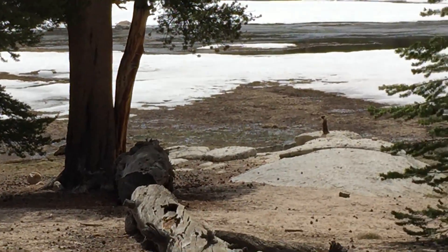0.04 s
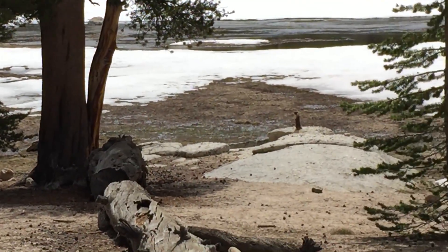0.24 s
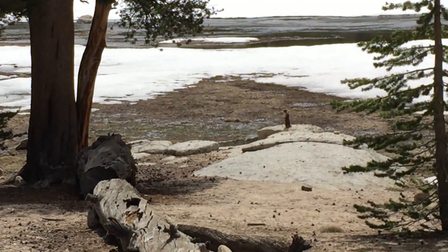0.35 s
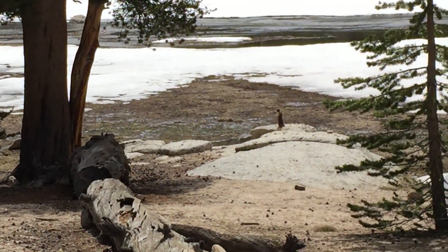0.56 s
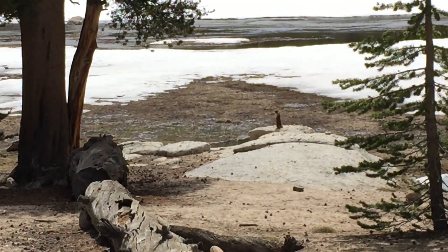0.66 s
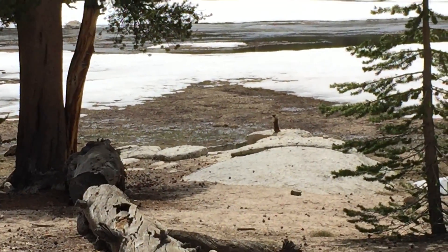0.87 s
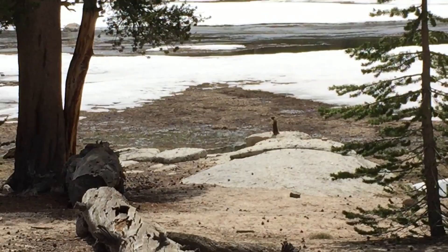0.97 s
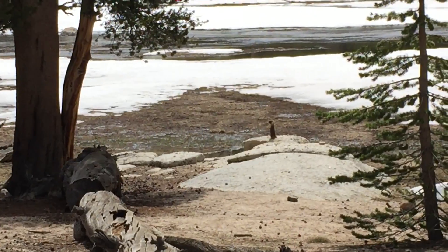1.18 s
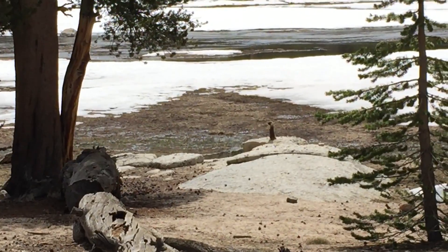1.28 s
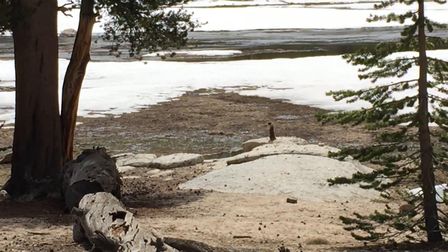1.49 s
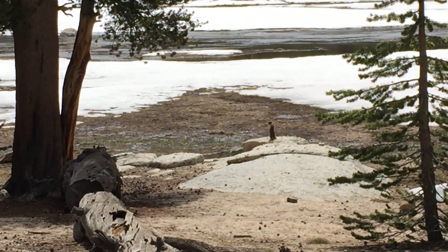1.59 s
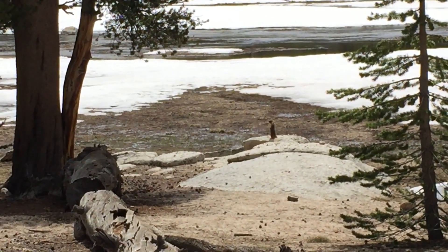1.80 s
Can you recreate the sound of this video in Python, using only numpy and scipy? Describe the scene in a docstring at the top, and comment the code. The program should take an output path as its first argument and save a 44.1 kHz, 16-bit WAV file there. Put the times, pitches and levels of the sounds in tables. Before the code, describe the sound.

Two sharp marmot whistles with echoing tails, over faint wind and distant water.

```python
"""A marmot on a rock at the edge of a mountain meadow gives two sharp alarm whistles.
Each is a harmonic tone that starts high and plunges, sweeping its overtones through the mouth resonance.
Rock, ground, nearby trees and the far forest edge scatter the calls back as echoes.
Beneath them lie light wind, distant running water, ticks of hiss, a far chirp and a faint whistling."""
import sys
import numpy as np
from scipy import signal
from scipy.fft import rfft, irfft, next_fast_len
from scipy.io import wavfile

SR = 44100
rng = np.random.default_rng(int(sys.argv[2]) if len(sys.argv) > 2 else 0)


def store_wav(level_fs):
    """Save 16-bit WAV to argv[1]."""
    pcm = np.round(np.clip(np.atleast_2d(level_fs), -1, 1) * 32767)
    wavfile.write(sys.argv[1], SR, pcm.T.astype(np.int16))


N = 81585

# noise spectra: frequency_hz, relative_level_db
WIND_SPECTRUM = [(20, -47), (35, -10), (60, -2), (105, 1.5), (175, -1), (240, -9.5), (310, -12.5),
                 (380, -18), (520, -26), (1000, -61)]
WATER_SPECTRUM = [(200, -45), (520, -9.5), (740, 5), (1200, 1), (1800, -3), (2300, -10.5), (3200, -11),
                  (4300, -19), (6500, -22.5), (9000, -26), (12000, -27.5), (16000, -29)]
TICK_SPECTRUM = [(1500, -33), (3300, 9), (6000, -6), (11000, -10), (15000, -10)]
# envelopes of the wind rumble and the faint whistling: time_s, level_db
WIND_ENVELOPE = [(0.0, -49.5), (0.102, -57), (0.132, -50.5), (0.292, -54), (0.406, -51.5), (0.778, -52.5),
                 (0.896, -48.5), (0.916, -69), (0.936, -51.5), (1.204, -50.5), (1.256, -48), (1.442, -53.5),
                 (1.478, -49), (1.664, -56.5), (1.684, -50), (1.85, -50.5)]
WHISTLING_ENVELOPE = [(1.42, -117), (1.52, -63), (1.65, -59), (1.85, -68.5)]
# ticks of hiss: centre_s, half_width_s, level_db
TICKS = [(0.2316, 0.0015, -52), (0.258, 0.017, -57.5), (1.098, 0.0032, -67.5), (1.228, 0.0022, -66)]
# distant chirp: centre_s, pitch_hz, level_db
FAR_CHIRPS = [(1.099, 2770, -56)]
# frequency responses of the reflectors: frequency_hz, gain_db
ROCK_RESPONSE = [(1000, 13), (2200, -3), (3000, -3), (3300, -4.5), (4300, -7), (5500, -5.5), (6500, 3),
                 (8000, -2), (11000, 1)]
TRUNKS_RESPONSE = [(800, -7), (2200, -6.5), (2800, 0), (3200, 5), (4300, -16), (5500, -7.5), (6400, -1.5),
                   (8000, -8), (15000, -4.5)]
BRANCHES_RESPONSE = [(1000, -6), (2500, 8), (3200, -10), (4300, -20), (5600, 4), (7000, 4), (10000, 5),
                     (15000, -4)]
FOREST_RESPONSE = [(800, 16), (2000, -13), (2500, -12), (2950, 6.5), (3250, -2.5), (4200, -18.5),
                   (6500, -30), (15000, -40)]
# mouth resonance: frequency_hz, gain_db
MOUTH_RESPONSE = [(700, -27), (1200, -18.5), (1800, -16.5), (2300, -7.5), (2700, -2), (3200, 0.5),
                  (3800, 1), (4400, 9), (5150, -3), (5750, -14), (6500, -21), (8000, -19.5), (9600, -23.5),
                  (11000, -22), (12000, -41), (16000, -58)]
# harmonics ahead of the mouth, fundamental first: level_db, attack_s, duration_share_of_plunge
HARMONICS = [(-1, 0.00091, 1), (-7, 0.0012, 0.85), (-13.5, 0.0023, 0.69), (-13, 0.013, 0.76)]
# alarm calls: start_s, pitch_hz, plunge_s, level_db, dip_db, push_db, overtone_push_db,
# forest_echo_db, forest_depth_s
WHISTLES = [(0.2472, 3218, .0392, -24, -4.5, -1.5, 0.5, -15, 0.3),
            (1.5311, 3199, 0.038, -24.5, -14, 1, 2, -16.5, 0.3)]

PLUNGE_POWER, ONSET_HZ, ONSET_S = 3.0, 940, 0.00063  # the pitch overshoots at onset and settles at once
DIP_AT_S, DIP_WIDTH_S, PUSH_AT_S, PUSH_WIDTH_S = 0.015, 0.0027, 0.024, 0.006  # a dip, then a swell
JITTER, PLUNGE_JITTER = 0.0017, 0.02  # shares of the pitch: the tone roughens as it drops
FADE_AT_SHARE, FADE_DB_PER_S, RELEASE_S = 0.81, 1300, 0.0055
CLUMP_DB, CLUMP_RATE_HZ = 3, 16.7  # reflections arrive in clumps


def undb(db):
    """Amplitude grows tenfold for every 20 decibels."""
    return 10 ** (np.asarray(db) / 20)


def gain_at(hz, curve):
    """A frequency response, interpolated in decibels along a logarithmic frequency axis."""
    frequency_hz, gain_db = np.array(curve, float).T
    return undb(np.interp(np.log(np.maximum(hz, 1)), np.log(frequency_hz), gain_db))


def filtered(x, curve):
    """Linear filtering multiplies a spectrum by a frequency response."""
    return irfft(rfft(x) * gain_at(np.fft.rfftfreq(len(x), 1 / SR), curve), len(x))


def noise(spectrum):
    """Filtered white noise takes the spectral shape of its filter; scaled to rms 1."""
    x = filtered(rng.standard_normal(N), spectrum)
    return x / x.std()


def drift(rate_hz):
    """Low-pass noise gives a smooth random modulation of standard deviation 1."""
    size = next_fast_len(N)
    hz = np.fft.rfftfreq(size, 1 / SR)
    x = irfft(rfft(rng.standard_normal(size)) * np.exp(-(hz / rate_hz) ** 2) * (hz > 0), size)[:N]
    return x / x.std()


def bump(t, centre_s, half_width_s):
    """A Gaussian pulse of height 1."""
    return np.exp(-((t - centre_s) / half_width_s) ** 2)


def wind(t):
    """Wind rumbles as low-frequency noise and flutters by amplitude modulation."""
    rumble = noise(WIND_SPECTRUM)
    level_db = np.interp(t, *np.array(WIND_ENVELOPE).T) + 0.5
    return rumble * undb(level_db + drift(rate_hz=19))


def distant_water(level_db=-60.5, flicker_db=2.5):
    """Running water is broadband noise; its quarter-octave bands are modulated independently."""
    spectrum = rfft(noise(WATER_SPECTRUM))
    hz = np.fft.rfftfreq(N, 1 / SR)
    band_of_bin = np.floor(4 * np.log2(np.maximum(hz, 200) / 200))
    rush = 0
    for band in np.unique(band_of_bin):
        flicker = undb(flicker_db * drift(rate_hz=19) * (band < 16))  # steady above 3200 Hz
        rush = rush + irfft(spectrum * (band_of_bin == band), N) * flicker
    return undb(level_db) * rush


def ticks(t):
    """Short envelopes on high-frequency noise are heard as thin ticks."""
    return noise(TICK_SPECTRUM) * sum(undb(db) * bump(t, at_s, width_s) for at_s, width_s, db in TICKS)


def faint_whistling(t, centre_hz=1915, half_width_hz=290):
    """Narrow-band noise has a vague pitch at its centre; this band swells toward the end."""
    band = noise([(centre_hz - 2 * half_width_hz, -22), (centre_hz, 0),
                  (centre_hz + 2 * half_width_hz, -22)])
    edges_hz = [centre_hz - half_width_hz, centre_hz + half_width_hz]
    band = signal.sosfilt(signal.butter(1, edges_hz, "band", fs=SR, output="sos"), band)
    return band / band.std() * undb(np.interp(t, *np.array(WHISTLING_ENVELOPE).T))


def scatter(x, envelope):
    """Diffuse reflection is convolution with a noisy impulse response, here of about unit energy."""
    strength = envelope * undb(CLUMP_DB * drift(CLUMP_RATE_HZ))
    response = rng.standard_normal(N) * strength / np.sqrt(np.sum(strength ** 2))
    return signal.fftconvolve(x, response)[:N]


def far_chirp(t, half_width_s=0.005, fall_hz_per_s=30000):
    """A linear downward frequency sweep makes a faint chirp, trailed by its diffuse echo."""
    chirp = 0
    for centre_s, pitch_hz, level_db in FAR_CHIRPS:
        offset_s = t - centre_s
        phase = 2 * np.pi * offset_s * (pitch_hz - fall_hz_per_s * offset_s / 2)
        chirp = chirp + undb(level_db) * bump(t, centre_s, half_width_s) * np.sin(phase)
    return chirp + undb(-0.5) * scatter(chirp, np.exp(-t / 0.15))


def decay(t, delay_s, t60_s):
    """Reverberation begins after the travel delay and decays exponentially, 60 dB in t60_s."""
    return (t > delay_s) * np.exp(-np.log(1000) * np.maximum(t - delay_s, 0) / t60_s)


def echoes(t, call, forest_db, depth_s, edge_s=0.016):
    """Longer paths return later: rock and ground first, then trunks, forest and branches."""
    ground = undb(-21) * scatter(call, decay(t, delay_s=0.015, t60_s=0.083))
    rock = undb(-4) * scatter(filtered(call, ROCK_RESPONSE), decay(t, delay_s=0.00063, t60_s=0.068))
    trunks = undb(-7) * filtered(scatter(call, decay(t, delay_s=0.025, t60_s=0.18)), TRUNKS_RESPONSE)
    # past the forest's depth the wash drops to a weaker tail
    far_edge = 0.5 - 0.5 * np.tanh((t - depth_s) / edge_s / 2)
    wash = decay(t, delay_s=0.073, t60_s=2.17) * (far_edge + undb(-14))
    forest = undb(forest_db) * scatter(filtered(call, FOREST_RESPONSE), wash)
    branches = undb(-27) * scatter(filtered(call, BRANCHES_RESPONSE), decay(t, delay_s=0.1, t60_s=0.54))
    return rock + ground + trunks + branches + forest


def marmot_whistle(t, start_s, pitch_hz, plunge_s, level_db, dip_db, push_db, overtone_push_db):
    """Source and filter: a tone plunges ever faster, and the mouth resonance picks out its octave."""
    age_s = np.clip(t - start_s, 0, plunge_s)
    plunge = (age_s / plunge_s) ** PLUNGE_POWER
    hz = pitch_hz * (1 - plunge) + ONSET_HZ * np.exp(-age_s / ONSET_S)
    jitter = (JITTER + PLUNGE_JITTER * plunge) * drift(rate_hz=980)
    phase = 2 * np.pi * np.cumsum(hz * (1 + jitter) * (age_s > 0)) / SR
    dip = bump(age_s, DIP_AT_S, DIP_WIDTH_S)
    push = bump(age_s, PUSH_AT_S, PUSH_WIDTH_S)
    fade_db = FADE_DB_PER_S * np.maximum(age_s - FADE_AT_SHARE * plunge_s, 0)
    tone = 0
    for k, (harmonic_db, attack_s, share) in enumerate(HARMONICS, 1):
        attack = np.clip(age_s / attack_s, 0, 1)
        release = np.clip((share * plunge_s - age_s) / RELEASE_S, 0, 1)
        lift_db = (k > 1) * overtone_push_db * push
        gain = undb(harmonic_db + lift_db + dip_db * dip / k ** 2)  # the fundamental dips deepest
        tone = tone + gain * attack * release * gain_at(k * hz, MOUTH_RESPONSE) * np.sin(k * phase)
    return tone * undb(level_db + push_db * push - fade_db)


def scene():
    """Superposition: the background, the direct calls and their echoes add in one channel."""
    t = np.arange(N) / SR
    meadow = wind(t) + distant_water() + ticks(t) + far_chirp(t) + faint_whistling(t)
    for *voice, forest_db, depth_s in WHISTLES:
        call = marmot_whistle(t, *voice)
        meadow = meadow + call + echoes(t, call, forest_db, depth_s)
    return meadow[None]


def record(dry):
    """Band limiting: a steep low-pass filter removes the highest treble."""
    cutoff_hz = 15850
    return signal.sosfilt(signal.ellip(10, 0.1, 70, cutoff_hz, fs=SR, output="sos"), dry)


dry = scene()
out = record(dry)
store_wav(out)
```